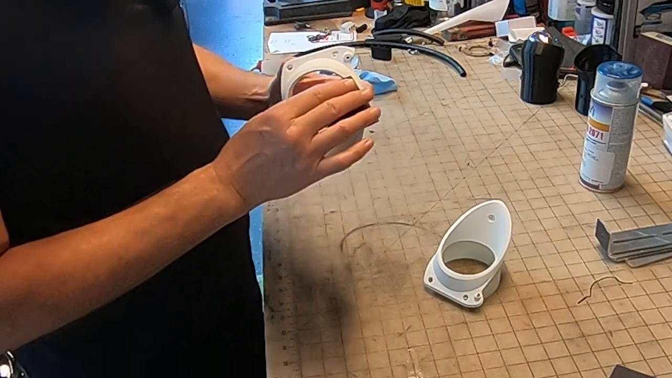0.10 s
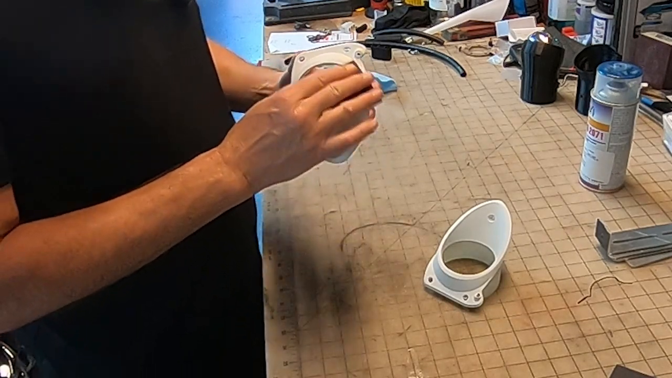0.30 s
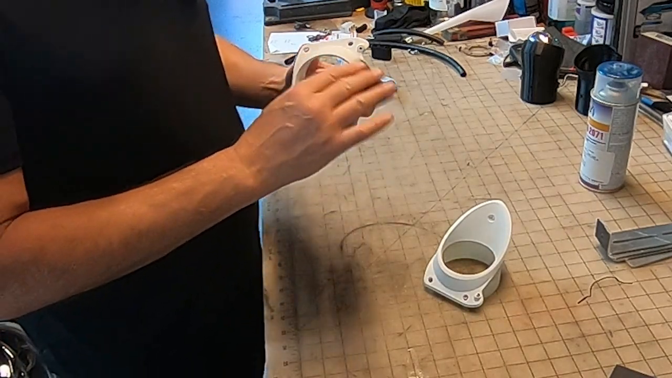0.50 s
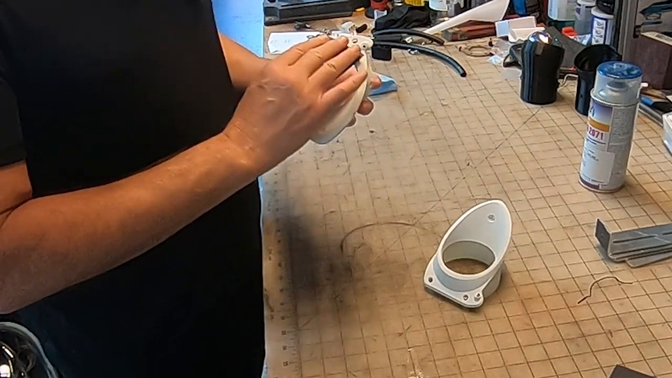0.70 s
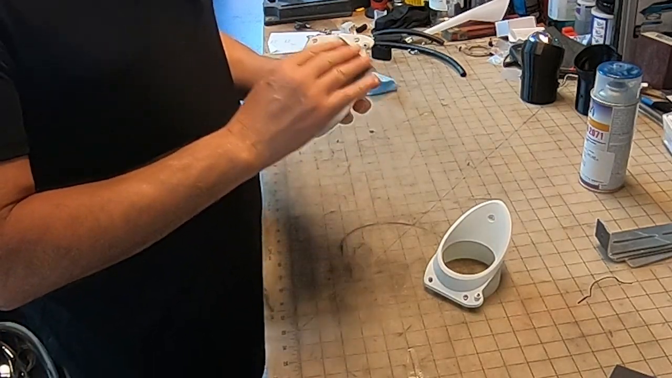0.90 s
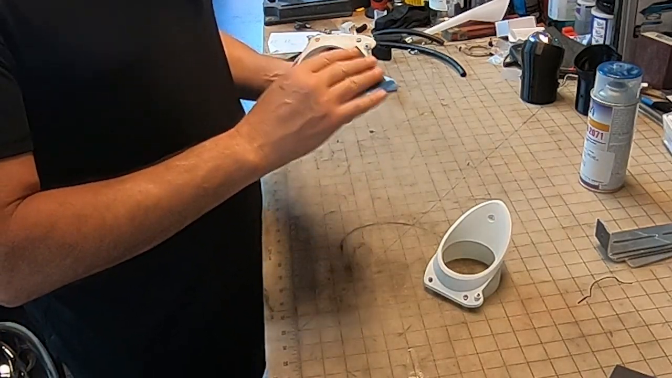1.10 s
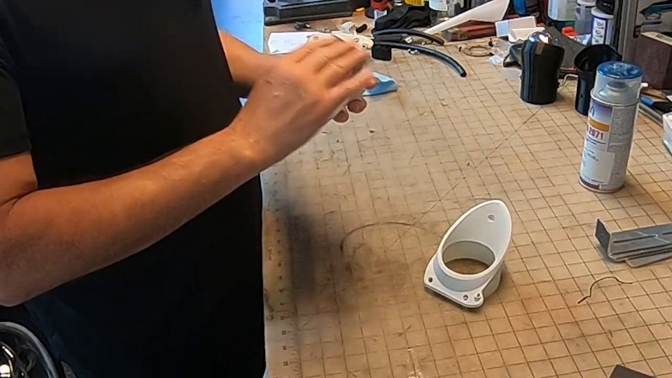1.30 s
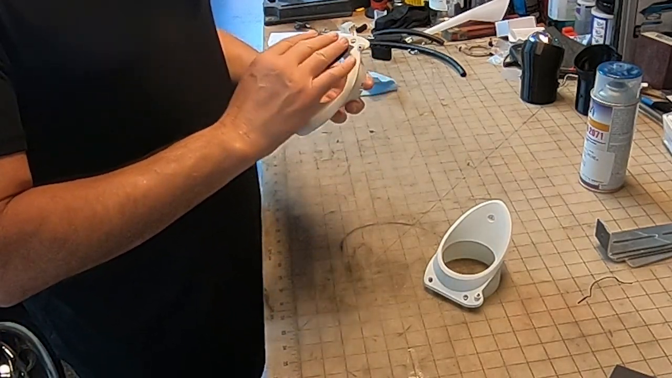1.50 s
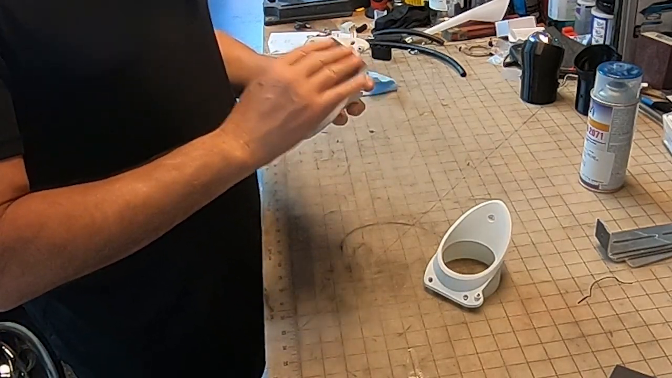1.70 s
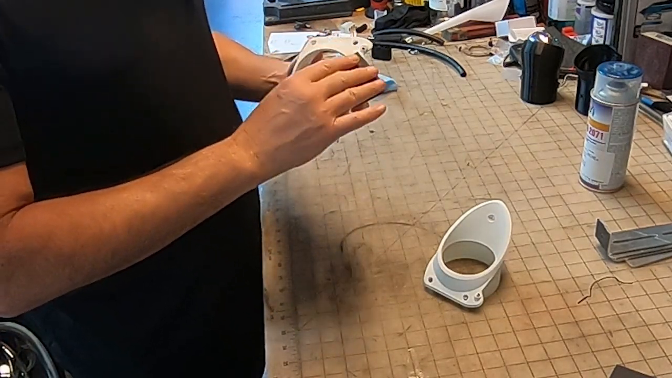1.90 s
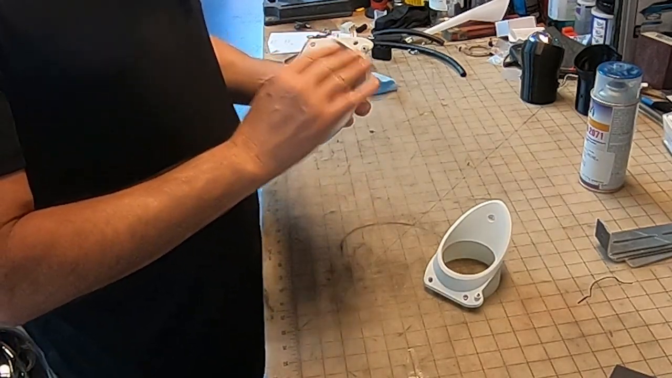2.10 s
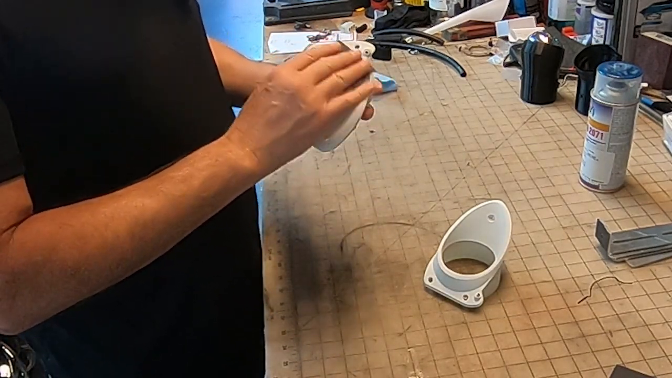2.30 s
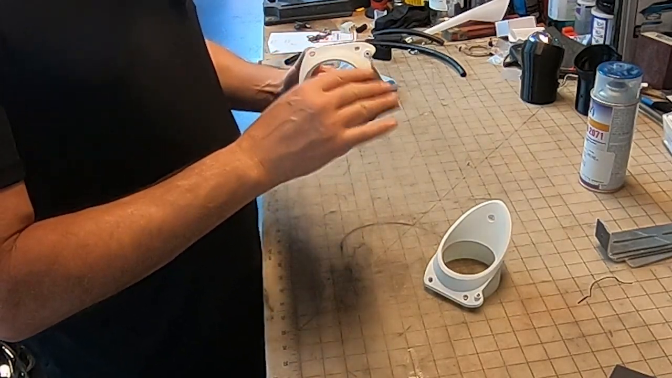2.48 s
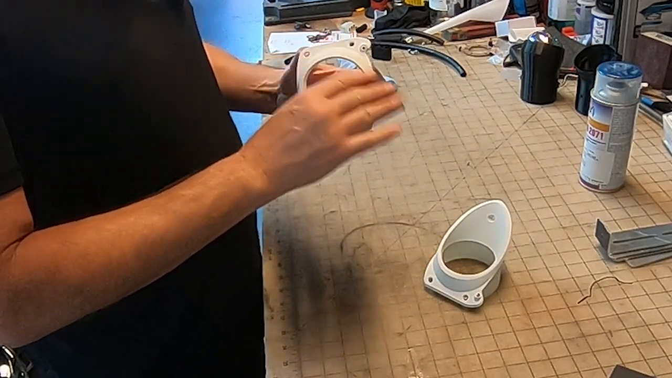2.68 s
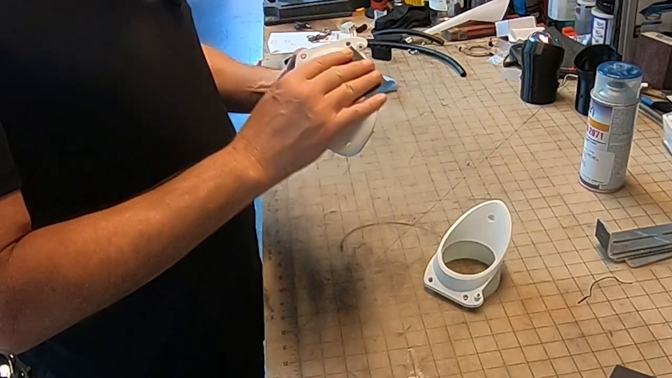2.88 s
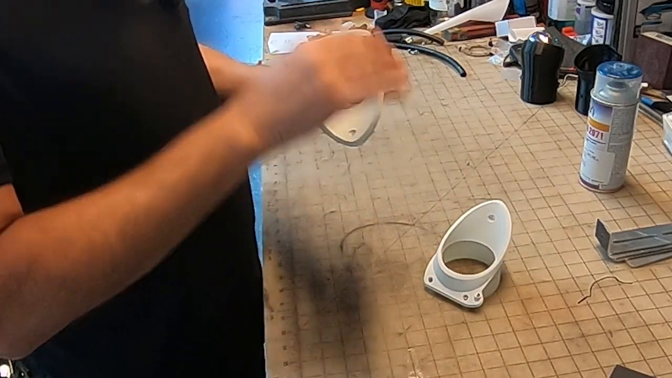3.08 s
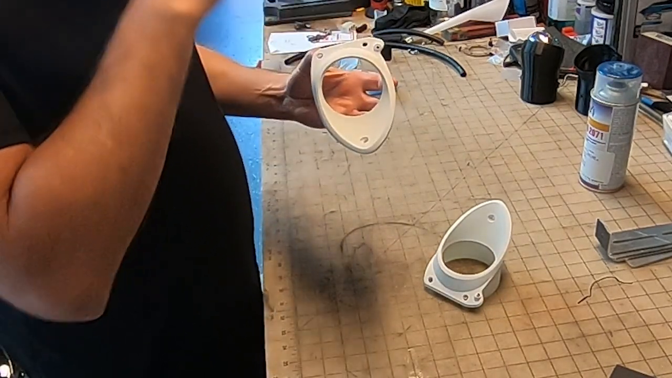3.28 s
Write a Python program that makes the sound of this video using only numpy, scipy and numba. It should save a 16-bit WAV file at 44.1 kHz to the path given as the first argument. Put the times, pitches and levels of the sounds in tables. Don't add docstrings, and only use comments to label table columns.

```python
import sys
import numpy as np
from scipy import signal
from scipy.fft import rfft, irfft
from scipy.io import wavfile
from scipy.ndimage import map_coordinates
from numba import njit

SR = 44100
rng = np.random.default_rng(int(sys.argv[2]) if len(sys.argv) > 2 else 0)


def volts_from_decibels(level):
    exponent = np.asarray(level, float) / 20
    return 10 ** exponent


def master(y):
    cut = np.clip(np.atleast_2d(y).T, -1, 1)
    pcm = np.round(cut * 32767)
    wavfile.write(sys.argv[1], SR, pcm.astype(np.int16))


N = 145530

# (start [s], stop [s], grit level [dB], change over the stroke [dB])
STROKES = [(0.224, 0.407, -45.5, 3.5), (0.444, 0.543, -47.5, 0), (0.568, 0.703, -39.5, -6),
           (0.733, 0.829, -42, -2), (.851, 0.98, -44.5, -2), (1.01, 1.103, -47, -7.5),
           (1.121, 1.247, -42, -1), (1.275, 1.373, -45, -1), (1.401, 1.522, -47, -9.5),
           (1.543, 1.652, -48, 2), (1.674, 1.796, -47, -18), (1.816, 1.926, -45.5, -3),
           (1.941, 2.059, -46.5, 3), (2.089, 2.215, -49, -4), (2.227, 2.35, -47.5, -5.5),
           (2.374, 2.496, -50, -2.5), (2.51, 2.613, -44.5, -1.5), (2.644, 2.753, -49.5, 12),
           (2.777, 2.887, -45.5, -4.5), (2.92, 3.018, -45.5, 12.5)]
# (level [dB], change over the stroke [dB])
SHELL_DRIVE = [(-50.5, -3.5), (-54.5, -12), (-52, 13), (-51.5, -24.5), (-57, 8), (-56.5, -10), (-52, -1.5),
               (-52.5, -6.5), (-54.5, -1.5), (-54, -7.5), (-53.5, -9.5), (-58, -18), (-54, -10.5),
               (-57.5, -17.5), (-54, -7.5), (-55.5, -6), (-55, 19.5), (-53, 10), (-58.5, 11), (-63, -39)]
# (lowest modes [dB], upper shell modes [dB], paper and rim modes [dB])
GRIP = [(3.5, -1.5, -3), (-0.5, -3.5, -11), (2, -1, -6), (-21, -7, -5), (4, 5.5, -0.5), (3, 6, 0),
        (0.5, 0.5, -5), (3.5, 2, 4.5), (4.5, 3.5, 3), (-0.5, 1, 1), (-18, 4, 2.5), (-3, 5, -4),
        (-1, 2.5, -2), (-5, 2.5, -3), (1, -0.5, -1), (1, -1, -1), (-5, -5, -2.5), (0, -0.5, 2.5),
        (3.5, 1, 1.5), (-12, -6, -4)]
# (third mode [dB], fourth mode [dB], top paper modes [dB])
PRESS = [(0, .1, 2), (-1, 4.5, 1), (0, 0.7, -2), (-5, 4, 3), (-6, 0.5, 0), (-25, 2, 5), (-16, -1, 0.5),
         (3, 0.5, 5), (-3, -4, -4), (-3, 0, 4), (-5, -2.5, 4), (0, .1, 3), (-6, 1.2, -0.5), (-11, -1.5, 2),
         (-5, .1, -1), (-11, -5.5, -2), (-7, -3.5, 4), (-16, -0.5, -5), (3, -1.5, 0), (8, -4, -5)]
# (start [s], length [s], level [dB], fade over the length [dB])
RIM = [
    (.530, 0.018, -48, 3),
    (0.813, 0.023, -46.5, 4),
    (1.092, 0.0079, -45.5, 6),
    (1.897, 0.029, -45.5, 10),
    (2.151, 0.039, -42, 5.5),
    (2.421, 0.048, -43.5, 0),
    (2.683, 0.068, -44.5, 3.5),
    (2.958, 0.063, -46.5, 5),
]
# (start [s], length [s], level [dB], fade over the length [dB], shell ringing [dB])
BRUSH = [
    (0.194, 0.047, -62.5, -4, 0.5),
    (3.143, 0.017, -67, -8, -18),
    (3.03, 0.034, -64.5, 6, -6),
    (3.275, .03, -82, 0, 3),
]
# (time [s], level [dB])
CATCHES = [(.2457, -49), (.2906, -46), (0.448, -57), (0.571, -50.5), (.6708, -59), (.7366, -59),
           (.7456, -56), (0.853, -51.5), (1.013, -53), (1.128, -51), (1.239, -44.5), (1.2824, -49),
           (1.4044, -53), (1.5488, -55), (1.675, -46.5), (1.687, -52), (1.8226, -62), (1.9518, -53),
           (2.096, -52.5), (2.2312, -58), (2.3775, -47), (2.4318, -55), (2.516, -57), (2.652, -54),
           (2.6867, -51), (2.788, -60), (2.8323, -54), (2.9246, -65)]
# (time [s], half length [s], extra level [dB])
LEANS = [
    (0.222, .015, 2.5),
    (0.346, 0.022, 3.5),
    (0.478, 0.014, 6),
    (0.899, 0.019, 5),
    (1.045, 0.014, 3),
    (1.16, 0.018, 0.5),
    (1.593, 0.013, 4.5),
    (1.98, .025, 4),
    (2.269, 0.033, 4),
    (2.538, 0.014, 0.5),
]
# (time [s], half length [s], extra level [dB])
PATCHES = [(0.537, 0.015, 5.5), (0.605, 0.036, 7.5), (0.815, .008, 8), (0.871, 0.022, 10.5),
           (1.077, 0.028, 9.5), (1.145, 0.018, 11), (1.637, 0.023, 9), (1.903, .01, 7.5),
           (1.968, 0.027, 8.5), (2.174, 0.012, 2), (2.517, 0.013, 12.5), (2.684, .01, 6.5),
           (2.792, 0.0062, 6)]
# (time [s], half length [s], extra level [dB])
FREED = [
    (.865, .0085, 14),
    (3.9, 0.016, 21),
    (7, 0.011, 24),
    (2.79, 0.012, 16),
    (0.35, 0.012, 0),
    (0.54, 0.022, 24),
    (0.454, 0.022, 5),
]
# (time [s], half length [s], extra level [dB])
FREED_THIRD = [
    (.25, 0.016, 5.2),
    (2.97, 0.011, 8),
    (2.59, .015, 4.6),
]
# (time [s], half length [s], extra level [dB])
FREED_UPPER = [
    (.26, 0.046, -13),
    (.35, 0.033, 7.5),
    (.675, .008, -3),
    (1.19, .015, 1),
    (1.47, 0.017, 5),
    (1.855, .01, 7),
    (2.194, 0.0094, 16),
    (2.70, 0.0088, 3),
]
# (time [s], level [dB])
CREEP = [
    (0, -76),
    (.03, -88),
    (.12, -95),
    (.18, -102),
]
# (frequency [Hz], level [dB])
GRIT = [(700, -25), (1500, -12.5), (2900, -8.5), (4200, -6.5), (9500, -4), (12500, -7), (15300, -3.5)]
# (frequency [Hz], width [Hz], level [dB])
SHELL = [(886, 57, -7), (1065, 187, -13.5), (1560, 136, -9), (1739, 190, -3), (2066, 710, -8),
         (2383, 51, 3), (2510, 150, -6)]
# (frequency [Hz], width [Hz], level [dB])
EDGE = [(3710, 250, -8), (4710, 310, -1), (4964, 395, 2), (5270, 430, 0), (5600, 160, -3.5), (6190, 225, 0),
        (7710, 590, -5), (9080, 320, -4), (9450, 190, -5.5), (10680, 260, -2.5), (11450, 260, -2.5),
        (15100, 2000, -4.5)]
# (frequency [Hz], width [Hz], share removed [0-1])
DIPS = [(3030, 450, .5), (4200, 420, .4)]
# (time [s], peak level [dB])
TAPS = [
    (.245, -64),
    (2.140, -60),
    (2.272, -58),
    (3.0303, -43),
    (3.0375, -52),
    (3.041, -53),
]
# (frequency [Hz], width [Hz], level [dB])
KNOCK = [(204, 38, -27), (438, 114, 1.5), (620, 210, 3), (925, 46, -12.5), (1100, 52, -13), (1700, 400, -7)]
# (time [s], level [dB])
RUSTLE = [
    (2.2, -85),
    (2.31, -76),
    (2.45, -80),
    (2.59, -67),
    (2.72, -76),
    (2.83, -72.5),
    (2.95, -65.5),
    (3.1, -63.5),
    (3.17, -75),
    (3.3, -71.5),
]
# (time [s], level [dB])
FINGERS = [
    (0, -87),
    (.05, -75),
    (.1, -74),
    (.145, -78),
    (.17, -94),
    (.2, -91),
    (3.1, -102),
    (3.17, -74.5),
    (3.3, -89),
]
# (time [s], level [dB])
SQUEAK = [
    (0, -94),
    (.12, -100),
    (.16, -95),
    (.19, -87),
    (.22, -99),
]
# (time [s], level [dB])
SETTLE = [
    (0, -74),
    (.1, -76.5),
    (.16, -83),
    (.23, -68),
    (.32, -90),
]
# (frequency [Hz], level [dB])
SHOP = [(20, -18), (60, -4.5), (230, -8), (320, -9), (600, -8.5), (1000, -9), (2600, -17), (16000, -27)]
# (frequency [Hz], width [Hz], level [dB])
HUMS = [(40.8, 6.2, -82), (114, 3.7, -83.5), (187, 28, -88), (235, 5.3, -80), (485, 60, -84.5)]

ATTACK_S, ATTACK_DB = 0.025, 16
RELEASE_S, RELEASE_DB = 0.031, 8.5
RIM_ATTACK_S, RIM_RELEASE_S = 0.0035, 0.01
SHELL_ATTACK_S, SHELL_RELEASE_S = 0.014, 0.02
CATCH_RISE_S, CATCH_S, CATCH_GRIT_DB = 0.002, 0.011, -14.5
GRAINS_PER_S, GRAIN_SPREAD_DB, PATCHY_DB = 20000, 0.36, 0.86
EDGE_DB, RIM_EDGE_DB, EDGE_RING_DB = -7, -0.5, 9.5
SHELL_DB, RIM_SHELL_DB, BRUSH_LOW_DB = 17, -12, 13.5
GRIP_RATE_HZ, WANDER_DB = 24, 1.5
PAPER_BANDS_HZ, PAPER_FLEX_DB = 3200 * 1.19 ** np.arange(10), 2.6
TAP_PUSH_S = 0.00019
RUSTLE_HZ, RUSTLE_WIDTH_HZ = 204, 127
SHOP_DB = -72
ROOM_DB, ROOM_T60_S, ROOM_TREBLE_T60_S = -17.5, 0.47, 0.61
TOP_HZ = 15800


def sanding(t):
    c = t[::16]
    lean = bumps(c, LEANS)
    passes = lean * np.array([stroke(c, a, b, db, change, ATTACK_S, RELEASE_S)
                              for a, b, db, change in STROKES])
    bodies = lean ** 0.11 * np.array([stroke(c, a, b, db, change, SHELL_ATTACK_S, SHELL_RELEASE_S)
                                      for (a, b, *_), (db, change) in zip(STROKES, SHELL_DRIVE)])
    rim = sum(short_contact(c, *row) for row in RIM)
    brushes = np.array([short_contact(c, *row[:4]) for row in BRUSH])
    creep = curve(c, CREEP, right=-120)
    catch = catches(c)

    brushed = volts_from_decibels(np.array(BRUSH)[:, -1]) @ brushes + creep
    jolts = volts_from_decibels(RIM_SHELL_DB) * rim + catch
    scrapes = rim + brushes.sum(0) + creep + volts_from_decibels(CATCH_GRIT_DB) * catch

    hiss = level(paper(colour(grains(), GRIT)), 0)
    hiss = hiss * np.interp(t, c, np.hypot(passes.sum(0), scrapes))
    return hiss + edge_ringing(t, c, passes, scrapes) + shell_ringing(t, c, bodies, jolts, brushed)


def edge_ringing(t, c, passes, scrapes):
    _, upper, bright = volts_from_decibels(np.array(GRIP).T)
    _, _, top = volts_from_decibels(np.array(PRESS).T)
    grit = colour(grains(), [(2000, 4), (3500, -0.57)])
    groups = [(EDGE[:1], upper, 1), (EDGE[1:6], bright, bumps(c, PATCHES)), (EDGE[6:], top, 1)]
    out = 0
    for modes, gain, patch in groups:
        drive = np.hypot(volts_from_decibels(EDGE_DB) * gain @ passes, volts_from_decibels(RIM_EDGE_DB) * scrapes) * patch
        out = out + ring(grit, modes, WANDER_DB) * np.interp(t, c, drive)
    return volts_from_decibels(EDGE_RING_DB) * out


def shell_ringing(t, c, bodies, jolts, brushed):
    low, upper, _ = volts_from_decibels(np.array(GRIP).T)
    third, fourth, _ = volts_from_decibels(np.array(PRESS).T)
    ticks = colour(grains(), [(400, -13), (800, -7.5), (2700, -2.0), (4000, 4)])
    low_extra = volts_from_decibels(-4.0) * jolts + volts_from_decibels(BRUSH_LOW_DB) * brushed
    extra = jolts + brushed
    groups = [(SHELL[:2], low, FREED, low_extra), (SHELL[2:3], third, FREED_THIRD, extra),
              (SHELL[3:4], fourth, [], extra), (SHELL[4:], upper, FREED_UPPER, extra)]
    out = 0
    for modes, gain, freed, other in groups:
        drive = np.hypot(gain @ bodies, other) * bumps(c, freed)
        out = out + ring(ticks * np.interp(t, c, drive), modes, WANDER_DB)
    return volts_from_decibels(SHELL_DB) * out


def grains():
    hit = rng.random(N) < GRAINS_PER_S / SR
    size = volts_from_decibels(GRAIN_SPREAD_DB * rng.exponential(size=N)) * rng.standard_normal(N)
    return level(hit * size * volts_from_decibels(PATCHY_DB * walk(150)), 0)


def paper(ticks):
    spectrum = rfft(ticks)
    log_hz = np.log(np.fft.rfftfreq(N, 1 / SR) + 1)
    out = 0
    for row in np.eye(len(PAPER_BANDS_HZ)):
        zone = np.interp(log_hz, np.log(PAPER_BANDS_HZ), row)
        out = out + irfft(spectrum * zone, N) * volts_from_decibels(PAPER_FLEX_DB * walk(21.98))
    return out


def stroke(t, start, stop, db, change_db, attack, release):
    u = np.clip((t - start) / (stop - start), 0, 1)
    rise = np.clip(1 - (t - start) / attack, 0, 9) ** 2
    fall = np.clip(1 - (stop - t) / release, 0, 9) ** 2
    return volts_from_decibels(db + change_db * (u - .5) - ATTACK_DB * rise - RELEASE_DB * fall)


def short_contact(t, start, length, db, fade_db):
    return stroke(t, start, start + length, db, -fade_db, RIM_ATTACK_S, RIM_RELEASE_S)


def catches(t):
    return sum(volts_from_decibels(db) * np.exp(-np.abs(t - at) / np.where(t < at, CATCH_RISE_S, CATCH_S))
               for at, db in CATCHES)


def handling(t):
    rustle = svf(rng.standard_normal(N), 1. * RUSTLE_HZ, 1. * RUSTLE_WIDTH_HZ)
    rustle = level(svf(rustle, 1. * RUSTLE_HZ, 1.5 * RUSTLE_WIDTH_HZ), 0)
    rustle = rustle * curve(t, RUSTLE, left=-99) * volts_from_decibels(walk(29.84))
    squeak = narrow_noise(3770.0, 130.0) * curve(t, SQUEAK, right=-120)
    settle = narrow_noise(450.0, 390.0) * curve(t, SETTLE, right=-120)
    lifted = t > 1
    held = narrow_noise(1715.0, 45.) * (1 - lifted) + narrow_noise(3740.0, 400.) * lifted
    held = held * curve(t, FINGERS) * volts_from_decibels(walk(46))
    return taps(t) + rustle + settle + squeak + held


def taps(t):
    push = 0
    for at, db in TAPS:
        u = np.clip(t - at, 0, .05) / TAP_PUSH_S
        push = push + volts_from_decibels(db) * u * np.exp(1 - u)
    return volts_from_decibels(-4.5) * sum(volts_from_decibels(db) * svf(push, 1. * f, 1. * w) * f / w for f, w, db in KNOCK)


def room(x):
    t = np.arange(SR // 2) / SR
    noise = rng.standard_normal((2, len(t)))
    low = svf(noise[0], 1200.0, 6400.0) * 10 ** (-3 * t / ROOM_T60_S)
    high = svf(noise[1], 9400.0, 13000.0) * 10 ** (-3 * t / ROOM_TREBLE_T60_S)
    tail = (low * 3.3 + high) * np.clip(t / 0.0017 - .5, 0, 1)
    return signal.fftconvolve(x, tail * volts_from_decibels(ROOM_DB) / np.sqrt(np.sum(tail ** 2)))[:N]


def shop():
    air = level(colour(rng.standard_normal(N), SHOP), SHOP_DB) * volts_from_decibels(0.91 * walk(10.54))
    return air + sum(narrow_noise(1. * f, 1. * w) * volts_from_decibels(db) for f, w, db in HUMS)


def ring(x, modes, wander_db):
    out = 0
    for k, (hz, width, db) in enumerate(modes):
        gain = (-1) ** k * volts_from_decibels(db + wander_db * walk(GRIP_RATE_HZ))
        out = out + gain * svf(x, 1. * hz, 1. * width)
    return out


@njit
def svf(x, hz, width):
    y, b, l = np.empty(len(x)), 0., 0.
    g, k = np.tan(np.pi * hz / SR), width / hz
    for i in range(len(x)):
        v = (b + g * (x[i] - l)) / (1 + g * (g + k))
        b, l, y[i] = 2 * v - b, l + 2 * g * v, k * v
    return y


def narrow_noise(hz, width):
    return level(svf(rng.standard_normal(N), hz, width), 0)


def colour(x, table):
    hz, db = np.array(table, float).T
    f = np.fft.rfftfreq(N, 1 / SR) + 1
    return irfft(rfft(x) * volts_from_decibels(np.interp(np.log(f), np.log(hz), db)), N)


def level(x, db):
    return x * volts_from_decibels(db) / np.sqrt(np.mean(x ** 2))


def curve(t, table, left=None, right=None):
    return volts_from_decibels(np.interp(t, *np.array(table).T, left=left, right=right))


def bumps(t, rows):
    return volts_from_decibels(sum(db * np.exp(-((t - at) / half) ** 2) for at, half, db in rows))


def walk(rate):
    knots = rng.standard_normal(800)
    coarse = map_coordinates(knots, [np.arange(0, N + 32, 32) * min(rate, 200) / SR], order=3)
    return np.interp(np.arange(N), np.arange(len(coarse)) * 32, coarse / coarse.std())


def scene():
    t = np.arange(N) / SR
    rub = sanding(t)
    for hz, width, share in DIPS:
        rub = rub - share * svf(rub, 1. * hz, 1. * width)
    work = rub + handling(t)
    return np.tile(work + room(work) + shop(), (2, 1))


def band_limit(x):
    return signal.sosfilt(signal.butter(12, 16150, fs=SR, output="sos"), x)


def record(dry):
    low_pass = signal.ellip(10, .2, 70, TOP_HZ, fs=SR, output="sos")
    mix = signal.sosfilt(low_pass, dry)
    return band_limit(mix)


dry = scene()
out = record(dry)
master(out)
```